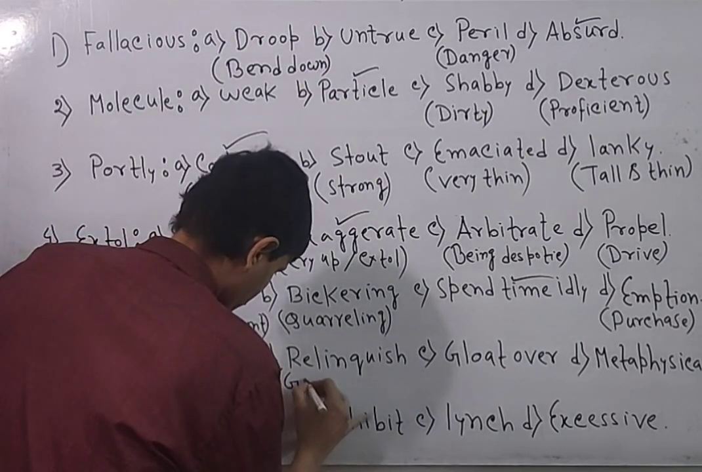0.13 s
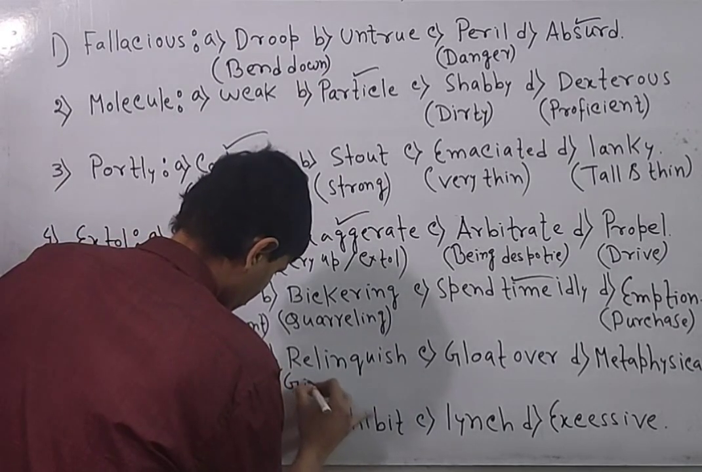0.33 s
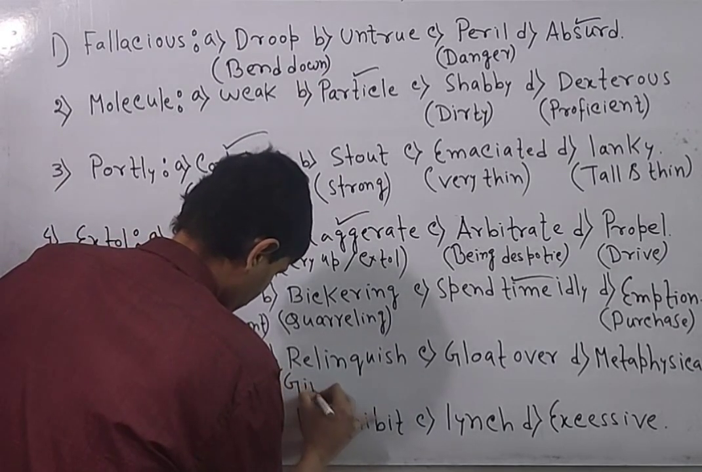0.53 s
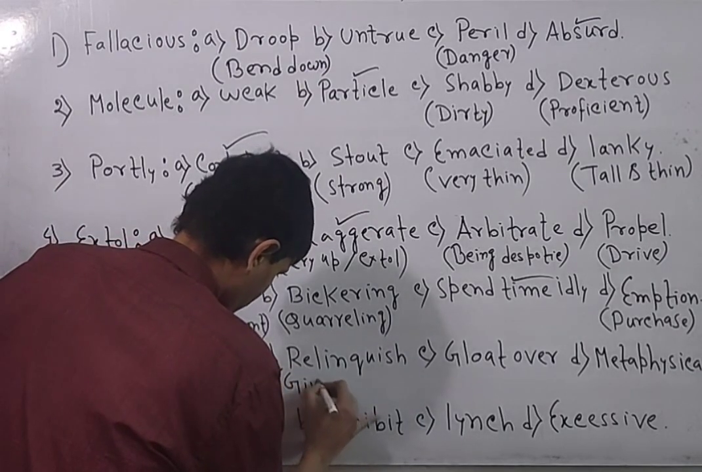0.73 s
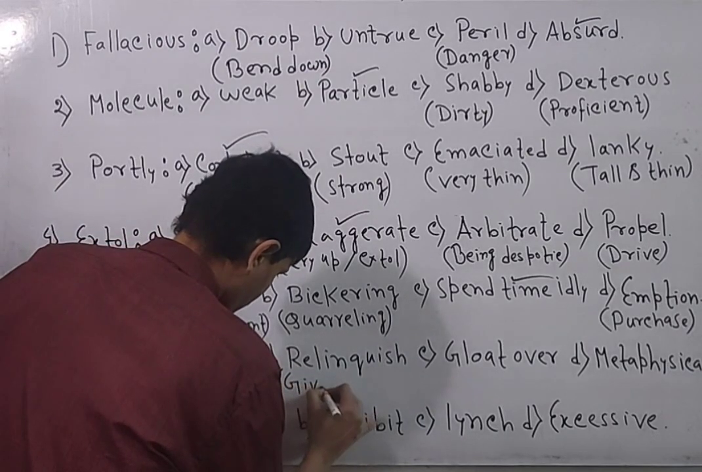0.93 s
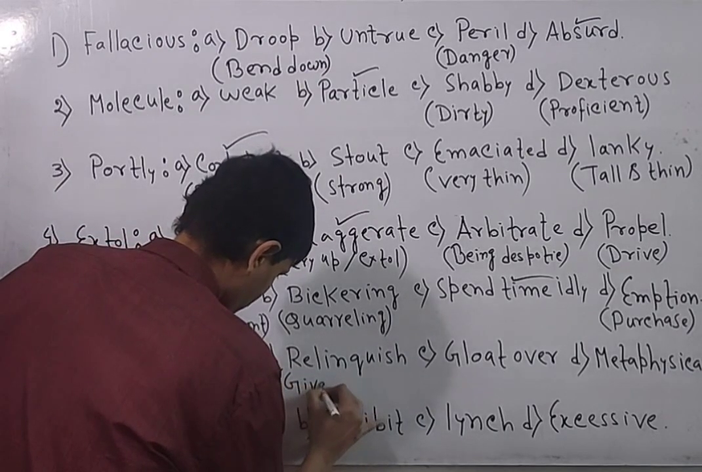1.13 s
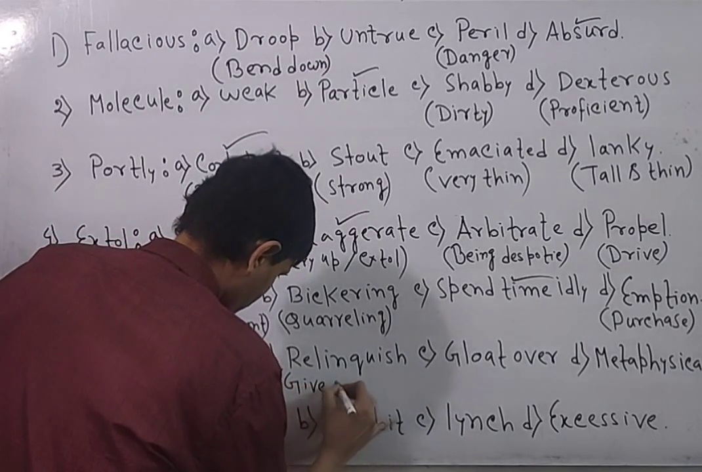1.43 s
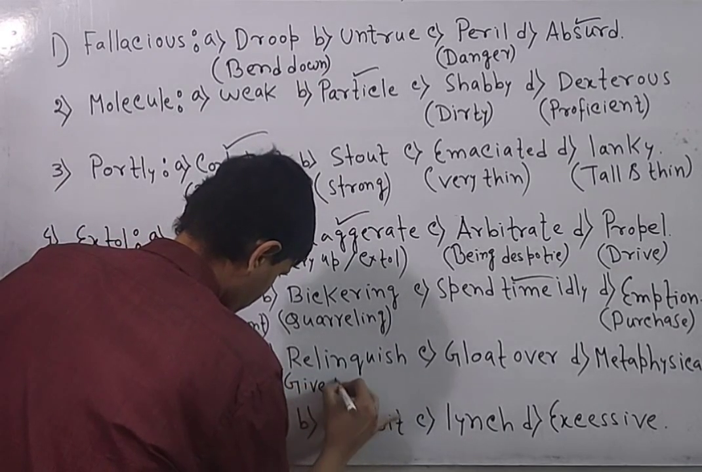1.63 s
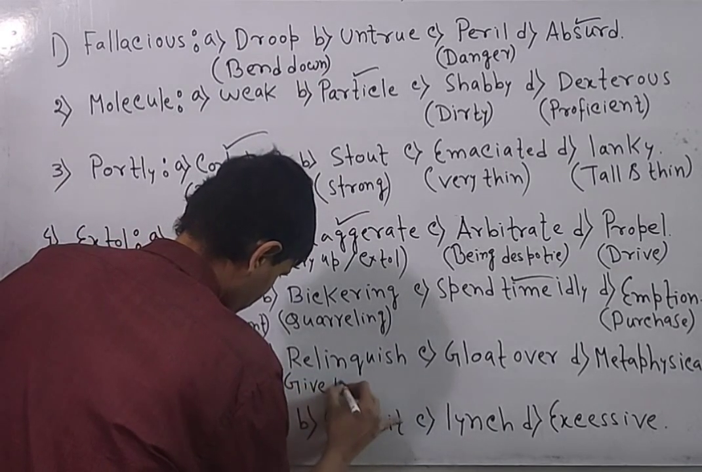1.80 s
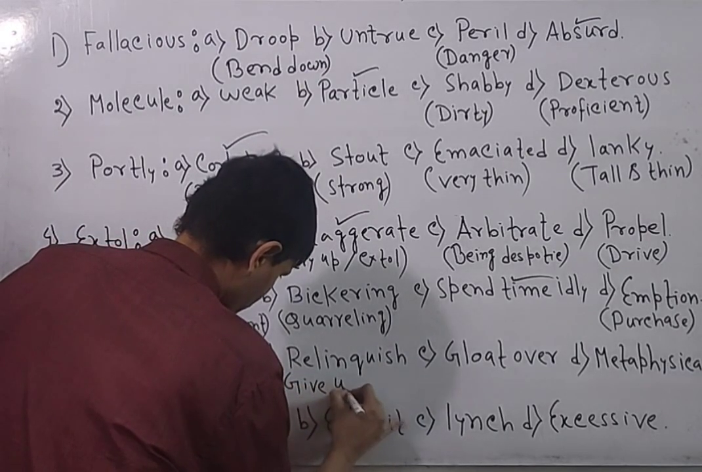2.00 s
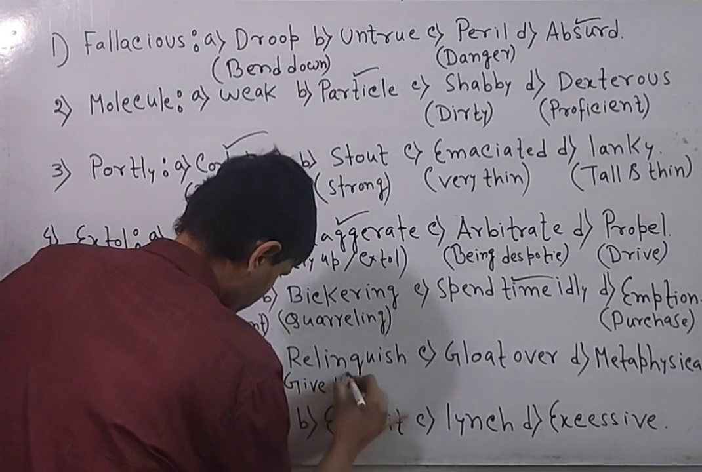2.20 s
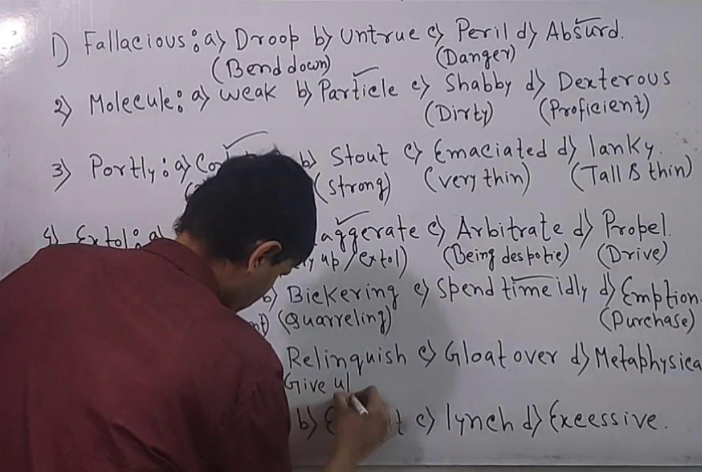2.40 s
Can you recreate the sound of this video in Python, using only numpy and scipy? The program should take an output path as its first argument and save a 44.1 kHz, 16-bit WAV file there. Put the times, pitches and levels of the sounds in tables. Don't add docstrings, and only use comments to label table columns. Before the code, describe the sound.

A marker pen writes on a thin whiteboard: quick hollow knocks, then short soft hissing strokes and a few dull low booms, close to the microphone in a quiet, slightly echoing classroom with faint background hiss.

```python
import sys
import numpy as np
from scipy import signal
from scipy.io import wavfile
from scipy.ndimage import uniform_filter1d

SR = 44100
rng = np.random.default_rng(int(sys.argv[2]) if len(sys.argv) > 2 else 0)


def ratio(d):
    e = np.asarray(d, float) / 20
    return 10 ** e


def pcm_store(signal):
    levels = np.round(np.clip(np.atleast_2d(signal), -1, 1) * 32767)
    wavfile.write(sys.argv[1], SR, levels.astype(np.int16).T)


N = 112454

# (pitch [Hz], level [dB], time to fall by 60 dB [s])
BOARD_MODES = [(145.4, -2.5, .5), (163.34, -3, 0.41), (202.94, 1.5, 0.28), (246.6, 1.5, 0.25),
               (265.8, 7, 0.12), (298.4, -4.5, 0.2), (356.3, -8.5, 0.27), (445, 6.5, 0.11),
               (516.4, 5, 0.15), (534.7, -7.5, 0.3), (560, -10, 0.13), (647, -2.5, 0.27),
               (728.4, -9.5, 0.24), (833.6, -13.5, 0.2)]


def evened(x):
    return x / np.sqrt(np.mean(x ** 2) + 1e-20)


def drift(x, seconds):
    return evened(uniform_filter1d(x, max(round(seconds * SR), 2)))


def read(points, hz):
    f, value = np.transpose(points)
    return np.interp(np.log(hz + 1), np.log(f + 1), value)


def add(mix, s, sound):
    at = round(s * SR)
    part = mix[max(at, 0):max(at + len(sound), 0)]
    part += sound[max(-at, 0):][:len(part)]


def resonate(x, hz, width_hz):
    turn = np.exp(2j * np.pi * hz * np.arange(len(x)) / SR)
    r = np.exp(-np.pi * width_hz / SR)
    return 2 * (turn * signal.lfilter([1 - r], [1, -r], x / turn)).real


def resonate_twice(x, hz, width_hz):
    return resonate(resonate(x, hz, width_hz), hz, width_hz)


def tap(boom_db, boom_hz, knock_db, knock_hz):
    t = np.arange(SR // 2) / SR
    dull = boom_db - knock_db
    contact_s = 0.0026 * ratio(0.15 * dull)
    mode_columns = np.transpose(BOARD_MODES)[:, :, None]
    hz, db, t60 = mode_columns

    bloom_start = np.minimum(ratio(-0.56 * dull), 1)
    bloom = 1 - (1 - bloom_start) * np.exp(-(t / 0.0085) ** 2)
    boom_octaves = np.log2(hz / boom_hz) / 0.77 * ratio(0.27 * dull)
    knock_octaves = np.log2(hz / knock_hz) / 0.25
    boom_share = bloom * ratio(boom_db - 6 * boom_octaves ** 2)
    share = boom_share + ratio(knock_db - 6 * knock_octaves ** 2)

    beside, turn = rng.uniform(-1.11, 1, (2, len(hz), 1))
    neighbour_hz = hz * (1 + 0.046 * beside)
    neighbour = ratio(-3.5 - 60 * t / t60) * np.sin(2 * np.pi * neighbour_hz * t + np.pi * turn)
    mode = ratio(-60 * t / t60) * np.cos(2 * np.pi * hz * (t - contact_s))
    ring = -(share * ratio(db) * (mode + neighbour)).sum(0) / 2

    u = np.maximum((t - contact_s) * np.pi * 230 + 1, 0)
    blow = -ratio(knock_db + 12) * u * np.exp(1 - u) * np.cos(2 * np.pi * knock_hz * (t - contact_s))
    thump = ratio(boom_db - 21 - 60 * t / 0.22) * np.sin(2 * np.pi * 105.8 * t)

    noise = rng.standard_normal(len(t))
    rattle = evened(resonate_twice(noise, 1180, 1100)) + ratio(-28) * noise
    tick = ratio(knock_db - 29.5) * np.exp(-t / 0.027) * rattle
    click = ratio(-57.5 + boom_db / 4) * np.exp(-t / 0.0032) * barrel(noise, 0.9)
    onset = np.sin(np.pi / 2 * np.minimum(t / contact_s / 2, 1)) ** 2
    return (ring + blow + tick + thump) * onset + click


def stroke(rise, fall, hiss_db, pitch):
    grains_per_s, fullness = 4800, 0.81
    t = np.arange(-rise, fall + 0.04, 1 / SR)
    speed = np.sin(np.pi / 2 * np.interp(t, [-rise, 0, fall], [0, 1, 0])) ** fullness
    draw = rng.random((4, SR // 2))[:, :len(t)]
    wobble = ratio(0.5 * drift(draw[3] - .5, 0.015))
    sign = np.sign(draw[0] - .5)
    happens = draw[1] < grains_per_s / SR
    size = ratio(-np.log(draw[2] + 1e-9))
    grains = speed * wobble * evened(sign * happens * size)
    push_db = -59.5 + .15 * (hiss_db + 59) + 36.5 * (rise + fall - 0.18)
    return ratio(hiss_db) * barrel(grains, pitch), ratio(push_db) * grains


def barrel(x, pitch):
    # (pitch [Hz], width [Hz], level [dB])
    pen_resonances = [(2086, 800, -2.5), (3857, 690, 2), (5010, 700, 5.5), (5570, 530, 6),
                      (8070, 1730, 6.5), (9250, 900, -4.5), (11670, 1500, 1.5), (14840, 1600, 1.5)]
    draw = rng.random((2, len(pen_resonances), SR // 2)) - .5
    grip = ratio(1.8 * drift(draw[0], 0.036))[:, :len(x)]
    ways = x * grip * np.sign(draw[1, :, :len(x)])
    peaks = 0
    for way, (hz, width_hz, db) in zip(ways, pen_resonances):
        evening = np.sqrt(SR / width_hz) / 3
        peaks = peaks + ratio(db) * resonate_twice(way, hz * pitch, width_hz) * evening
    return peaks / 2 + ratio(-20) * x


def rumble(push):
    modes = 0
    for hz, db, t60 in BOARD_MODES:
        modes = modes + ratio(db) * resonate(push, hz, 3.48 * 4.45 / t60) * np.sqrt(t60)
    rasp = resonate_twice(push, 750, 130)
    return 6 * ratio(-2.5) * modes + 4 * ratio(-13) * rasp


def room(x):
    # (pitch [Hz], time to fall by 60 dB [s])
    ring_times = [(120, 0.59), (300, 0.6), (700, 0.72), (1400, 1), (5000, 0.51), (14000, 0.24)]
    echoes = np.zeros(SR)
    at = np.arange(300, SR - 20, 20)
    echoes[at + rng.integers(0, 20, len(at))] = rng.choice([-1., 1.], len(at))
    hz, t, z = signal.stft(echoes, SR, nperseg=512)
    fade = ratio(-60 * t / read(ring_times, hz)[:, None])
    tail = signal.istft(z * fade, SR, nperseg=512)[1]
    return signal.fftconvolve(x, tail / np.linalg.norm(tail))[:N]


def air():
    # (pitch [Hz], level per Hz [dB])
    air_colour = [(18, -58), (30, -23), (227, 3.5), (1130, -11.5), (1280, -8.5), (1430, -12), (1590, -16.5),
                  (13000, -24), (16000, -22)]
    frames, hz = N // 256 + 5, np.fft.rfftfreq(1024, 1 / SR)
    a, b, patches = rng.standard_normal((frames, 513, 3)).T
    patches = uniform_filter1d(patches, size=8, axis=0)
    patches = evened(uniform_filter1d(patches, size=10, axis=1))
    z = (a + 1j * b) * ratio(read(air_colour, hz)[:, None] + .8 * patches)
    return ratio(-64.5) * evened(signal.istft(z, nperseg=1024, noverlap=768)[1][:N])


def scene():
    # (time [s], boom level [dB], boom pitch [Hz], knock level [dB], knock pitch [Hz])
    landings = [
        (-.022, -25, 237.6, -27.5, 656),
        (.2075, -17, 243, -25.5, 603),
        (0.4362, -26, 204, -35, 575),
        (.974, -32.5, 214, -52.5, 652),
        (1.186, -65, 232, -69, 714),
        (1.287, -53.5, 260, -61.5, 660),
        (1.436, -67.5, 243, -69.5, 670),
        (1.595, -26, 237.4, -52.5, 737),
        (1.961, -49.5, 270, -61.5, 650),
        (2.237, -21.5, 249, -52, 648),
    ]
    # (time of top speed [s], rise [s], fall [s], hiss level [dB], barrel pitch factor)
    strokes = [
        (.0, 0.062, 0.064, -64, .97),
        (.515, 0.037, 0.055, -66.5, 0.95),
        (0.689, .07, 0.078, -52.5, 0.97),
        (1.05, 0.064, 0.075, -59.5, 0.99),
        (1.145, .06, 0.069, -61, 1.01),
        (1.26, 0.081, 0.031, -59, 0.998),
        (1.70, 0.045, 0.14, -65, 0.967),
        (1.871, 0.074, 0.044, -55, 0.96),
        (1.98, 0.037, 0.074, -64, 0.98),
        (2.429, .15, 0.095, -62, 1.01),
    ]
    board, hiss, push = np.zeros((3, N))
    for s, *landing in landings:
        add(board, s, tap(*landing))
    for s, rise, *rest in strokes:
        high, low = stroke(rise, *rest)
        add(hiss, s - rise, high)
        add(push, s - rise, low)
    snag = np.exp(-np.arange(400) / 40) * rng.standard_normal(400)
    add(hiss, 1.196, ratio(-36) * barrel(snag, .95) / 6)
    board = board + rumble(push)
    echo = room(ratio(-10.5) * board + ratio(-16.5) * hiss)
    return (board + hiss + echo + air())[None]


def low_pass(x):
    return signal.sosfilt(signal.butter(12, 16430, fs=SR, output="sos"), x)


def record(dry):
    low_cut = signal.butter(2, 77, "high", fs=SR, output="sos")
    top_cut = signal.firwin(1023, 15480, window=("kaiser", 9), fs=SR)
    mix = signal.sosfilt(low_cut, dry)
    mix = signal.oaconvolve(mix, top_cut[None], "same")
    return low_pass(mix)


dry = scene()
out = record(dry)
pcm_store(out)
```